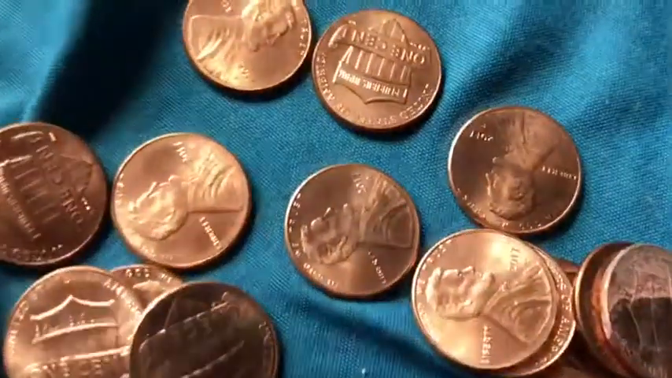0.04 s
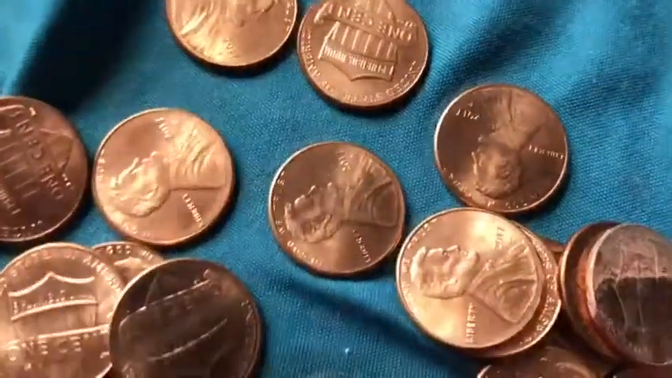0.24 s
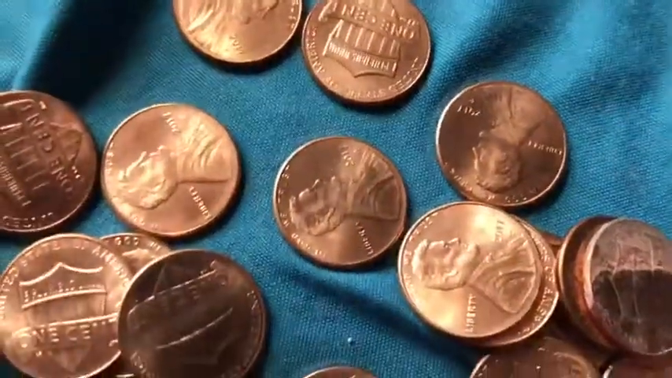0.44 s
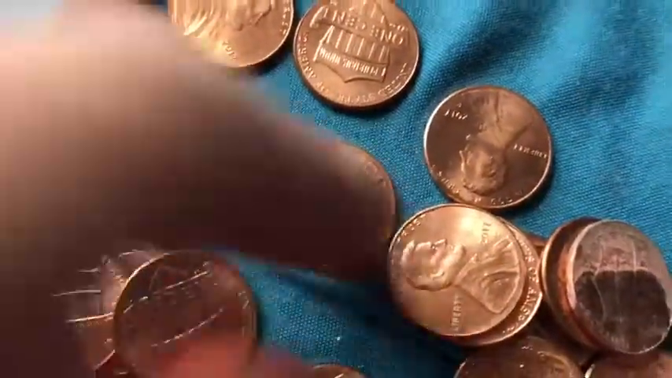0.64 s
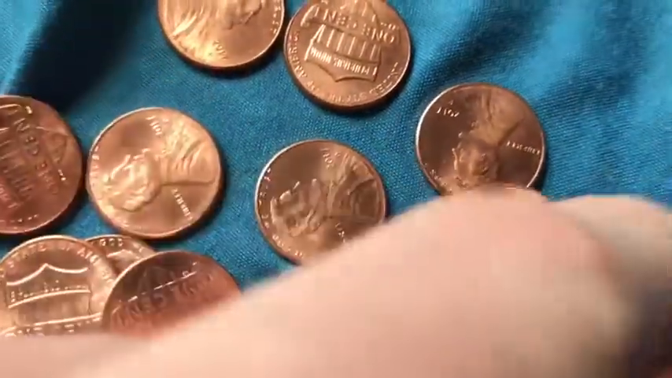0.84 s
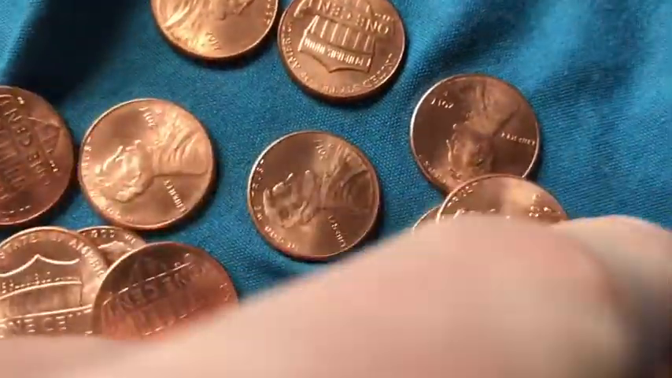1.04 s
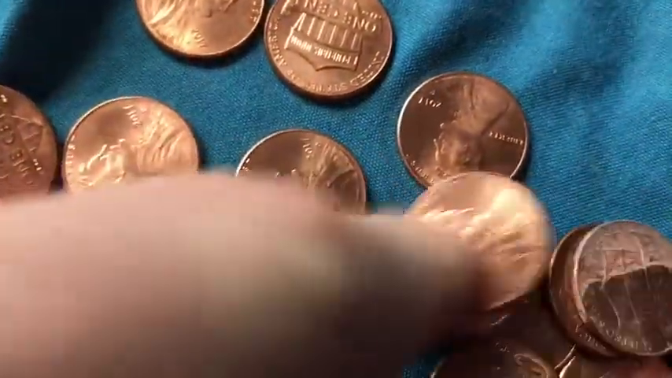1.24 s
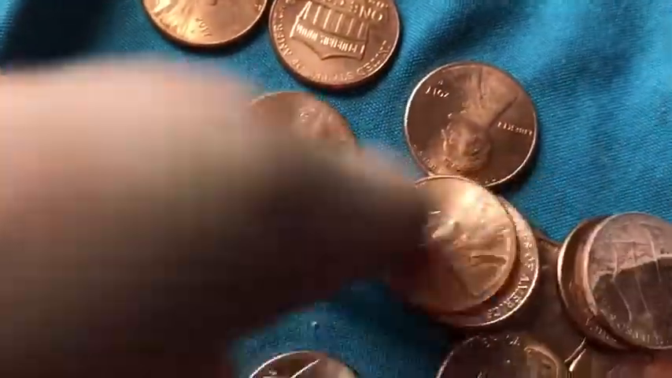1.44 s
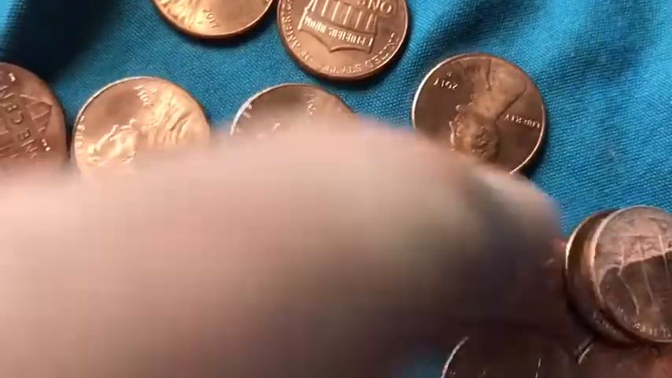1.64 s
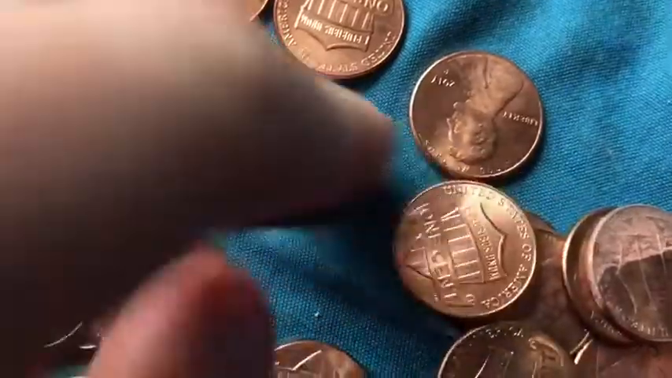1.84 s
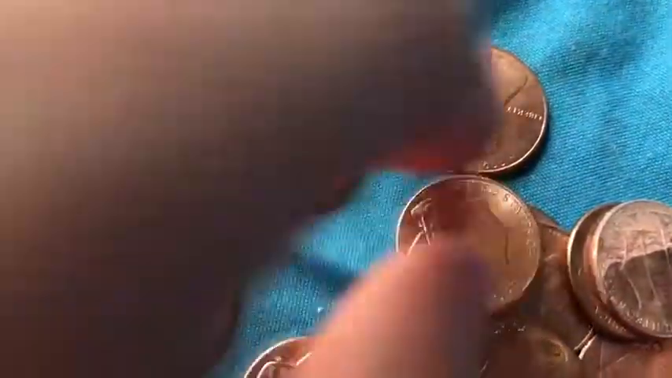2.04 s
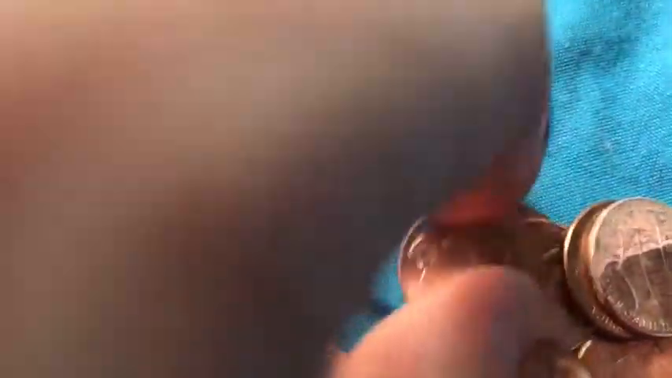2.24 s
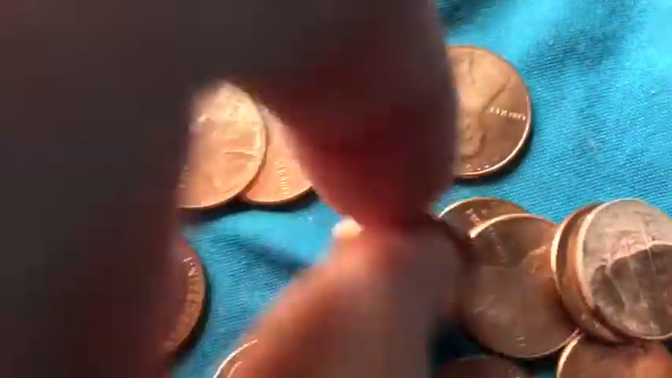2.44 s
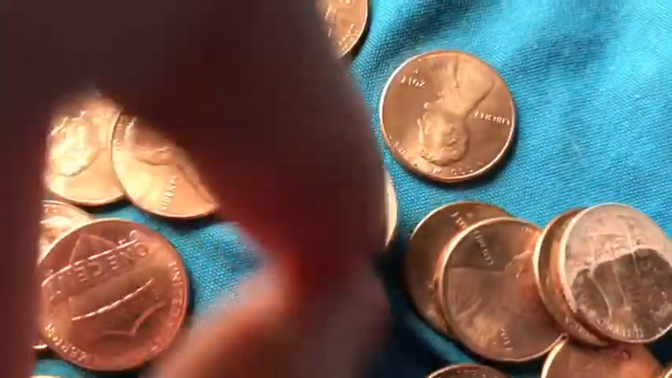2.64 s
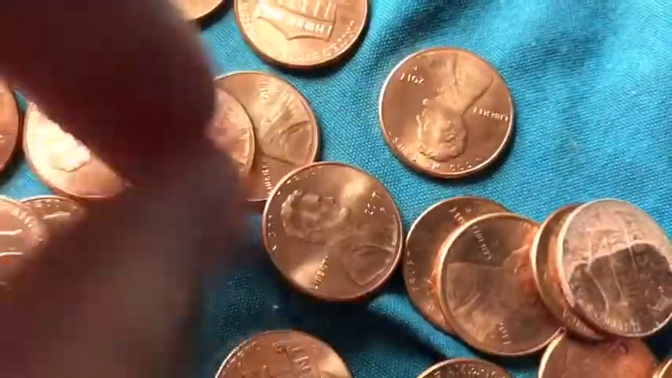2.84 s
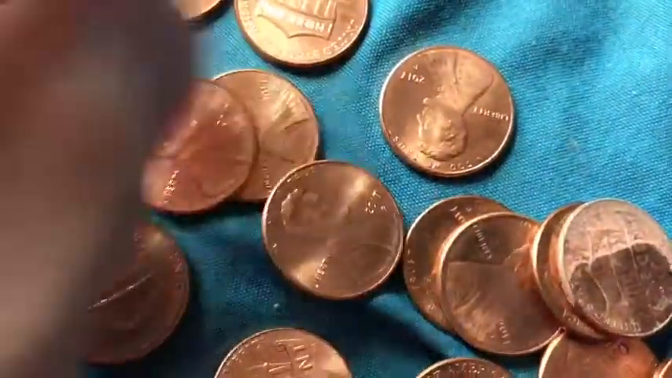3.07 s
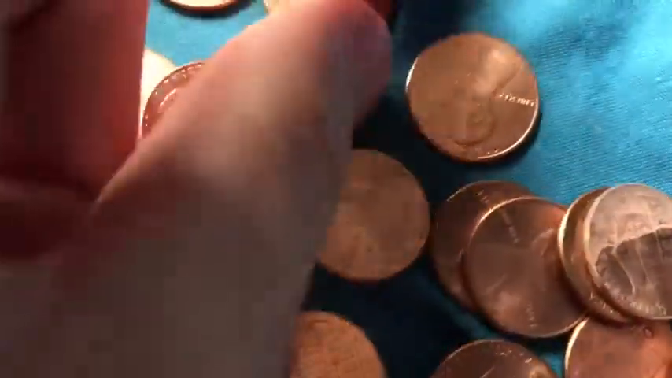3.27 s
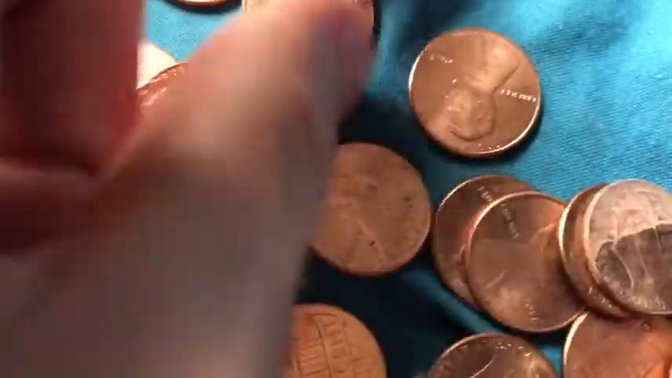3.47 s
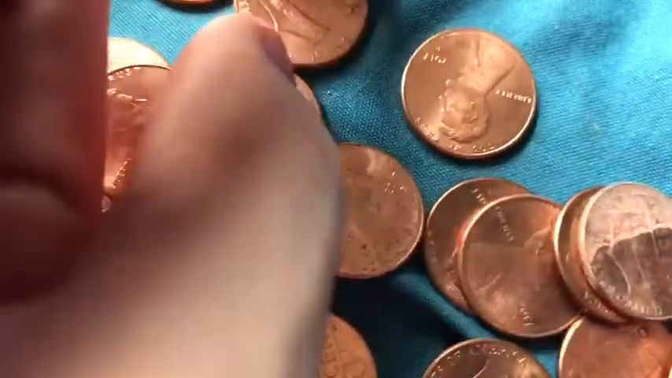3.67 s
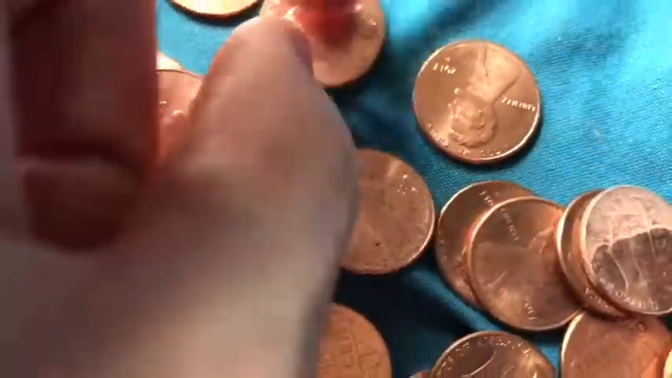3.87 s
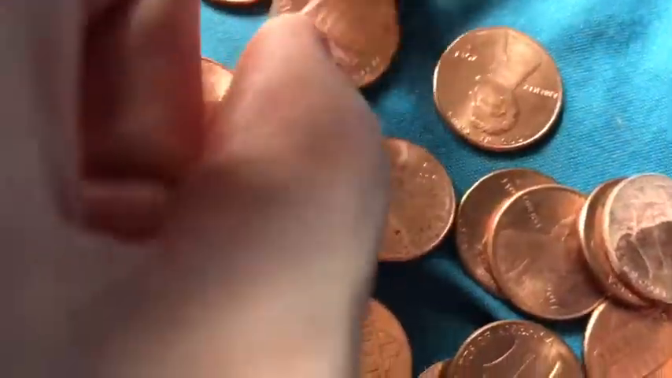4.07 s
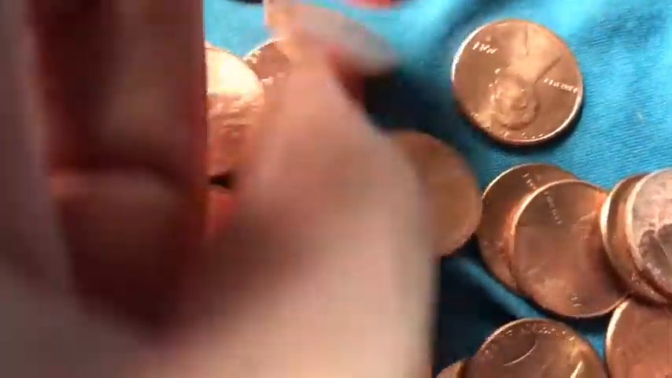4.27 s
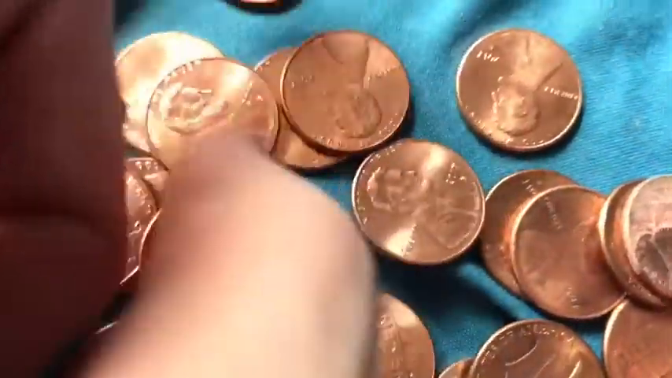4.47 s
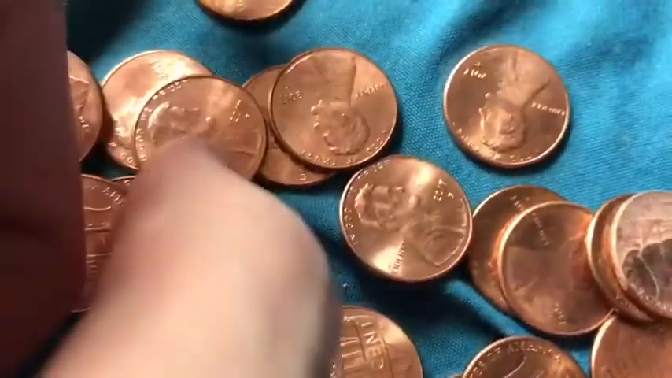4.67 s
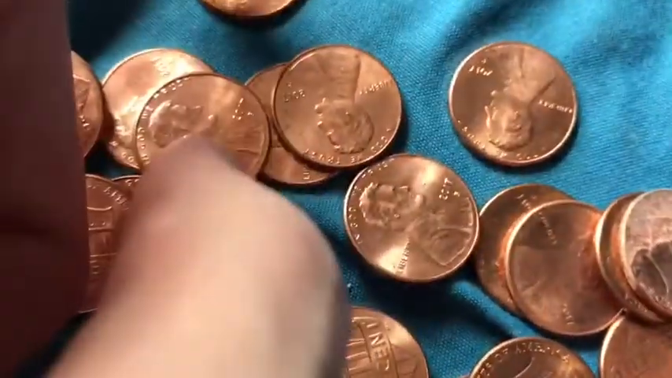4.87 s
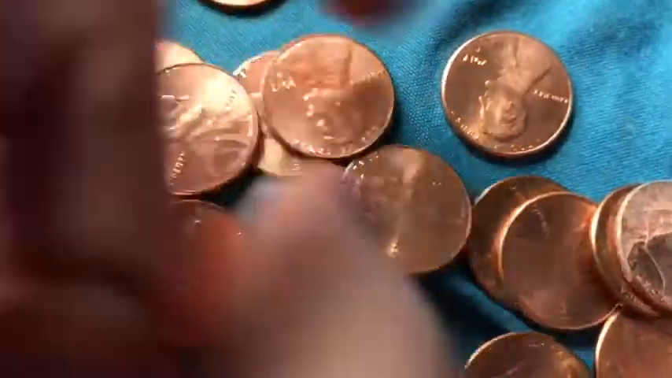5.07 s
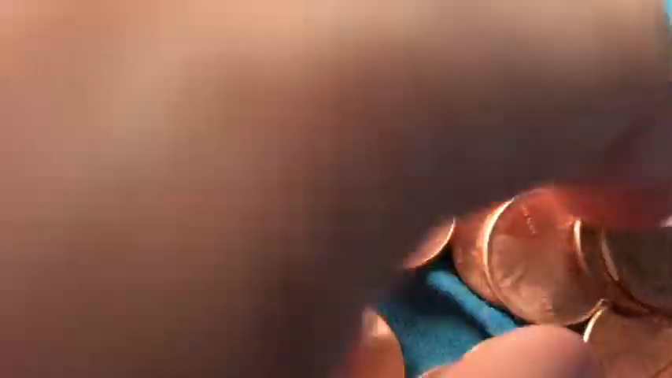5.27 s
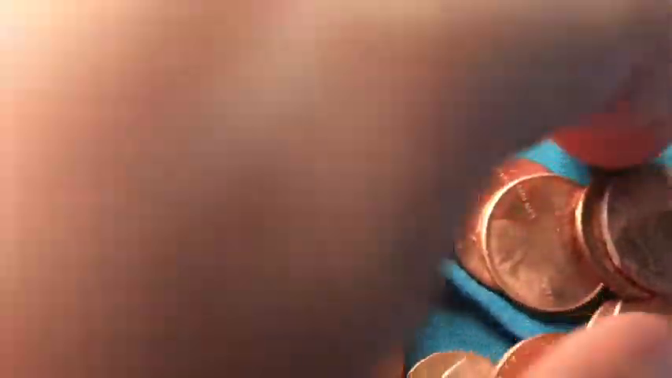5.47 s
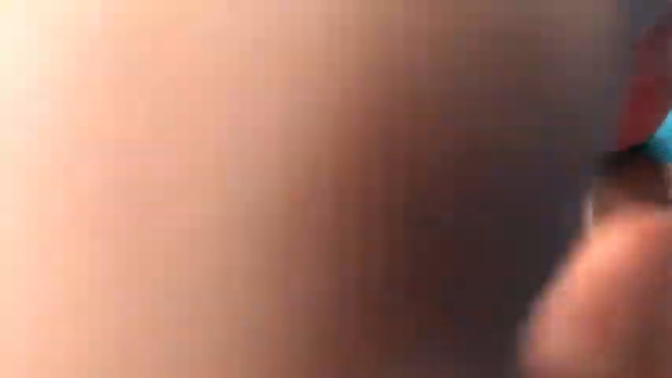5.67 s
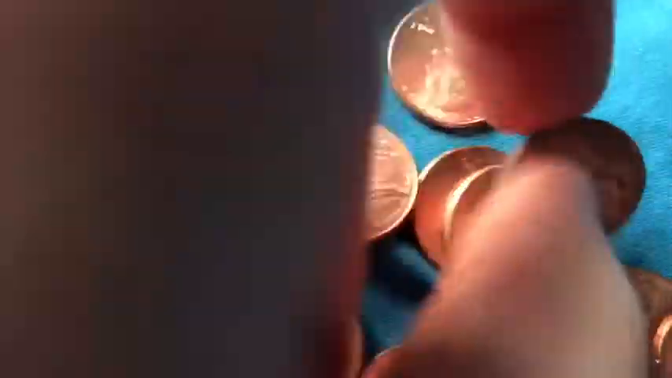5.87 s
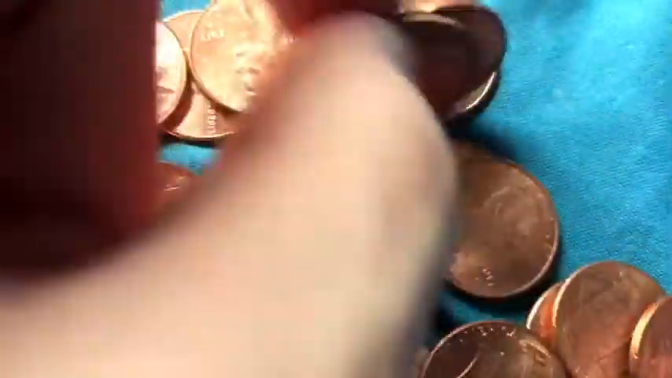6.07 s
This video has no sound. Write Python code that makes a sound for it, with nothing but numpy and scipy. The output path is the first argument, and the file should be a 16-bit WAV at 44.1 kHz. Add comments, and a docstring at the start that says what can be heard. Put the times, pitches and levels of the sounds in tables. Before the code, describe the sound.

Close to the microphone in a quiet room, faint ticks and a small creak come first. Then fingers push small coins on cloth: sharp, very high clinks with brief ringing, gritty metal slides and soft thuds, dense at first, then sparse, with a few stronger clinks and a light final cluster. Low rumble and intermittent faint hiss lie underneath.

```python
"""Coins pushed about on cloth

Fingers push small coins about on cloth, heard close in a quiet room. Noisy contacts drive damped modes: coins
clink and chatter, ring briefly very high, slide over each other or are rubbed by skin and cloth (dense
contacts) and thud (pushed resonance). A creak, ticks and a gliding squeak come early. Filtered-noise rumble,
sine hum and a faint high whine run throughout; a noise hiss switches on for five spells."""
import sys
import numpy as np
from scipy import signal
from scipy.fft import rfft, irfft
from scipy.io import wavfile
from scipy.ndimage import uniform_filter1d

SR = 44100
rng = np.random.default_rng(int(sys.argv[2]) if len(sys.argv) > 2 else 0)


def materialize(psi):
    """Save the field psi as 16-bit PCM at rate SR to the path in sys.argv[1].

    A 1-D psi becomes a single channel; in a 2-D psi each row is a channel.
    """
    bounded = np.clip(np.atleast_2d(psi).T, -1, 1)
    quanta = np.round(bounded * 32767).astype(np.int16)
    wavfile.write(sys.argv[1], SR, quanta)


N = 269314


def from_db(db):
    """Decibels to amplitude."""
    return 10 ** (np.asarray(db) / 20)


def rms_one(x):
    """Scale to an rms of 1."""
    return x / np.sqrt(np.mean(x ** 2) + 1e-20)


def peak_one(x):
    """Scale to a peak of 1."""
    return x / np.abs(x).max()


def add(out, start_s, sound):
    """Mix a sound into out, cut at its end."""
    i = round(start_s * SR)
    out[i:i + len(sound)] += sound[:N - i]


def minimum_phase(spectrum):
    """Causal impulse response with the given (Hz, dB) response, by folding the cepstrum."""
    hz = np.maximum(np.arange(2049) * SR / 4096, 10)
    points_hz, points_db = np.transpose(spectrum)
    log_gain = np.interp(np.log(hz), np.log(points_hz), points_db) * np.log(10) / 20
    cepstrum = irfft(log_gain)
    cepstrum[1:2048] *= 2
    cepstrum[2049:] = 0
    return irfft(np.exp(rfft(cepstrum)))


def coloured(x, spectrum):
    """Filter x to the given (Hz, dB) response."""
    return signal.fftconvolve(x, minimum_phase(spectrum))[:len(x)]


def ring(clicks, hz, t60_s):
    """Damped resonance: a unit click sets a sine of height 1 ringing."""
    radius = from_db(-60 / (t60_s * SR))
    angle = 2 * np.pi * min(hz, .45 * SR) / SR
    poles = [1, -2 * radius * np.cos(angle), radius * radius]
    return signal.lfilter([0, np.sin(angle)], poles, clicks + 1e-18)


# Room rumble spectrum. Each row: frequency in Hz, relative density in dB per Hz.
ROOM_SPECTRUM = [(15, -42), (25, -17.5), (43, -9), (65, -3), (87, -20), (154, -18.5), (245, -21.5),
                 (378, -30), (766, -33), (1390, -38.5), (4990, -45), (11600, -48.5), (15200, -45.5),
                 (16500, -84)]
ROOM_RMS_DB = -58.5


def rumble():
    """Steady noise with most of its power in the lowest octaves."""
    settle = 4096
    noise = rng.standard_normal(N + settle)
    return from_db(ROOM_RMS_DB) * rms_one(coloured(noise, ROOM_SPECTRUM)[settle:])


# Mains hum. Each row: frequency in Hz, level in dB rms.
HUM_TONES = [(60, -81.5), (120, -74)]


def hum():
    """Steady sines at the mains frequency and its double, in random phase."""
    t = np.arange(N) / SR
    out = np.zeros(N)
    for hz, rms_db in HUM_TONES:
        out += from_db(rms_db) * np.sqrt(2) * np.sin(2 * np.pi * (hz * t + rng.random()))
    return out


WHINE_HZ, WHINE_T60_S, WHINE_RMS_DB = 11350, 0.0062, -87


def whine():
    """Noise through one resonance: a faint steady band high up."""
    return from_db(WHINE_RMS_DB) * rms_one(ring(rng.standard_normal(N), WHINE_HZ, WHINE_T60_S))


# Hiss spectrum. Each row: frequency in Hz, relative density in dB per Hz.
HISS_SPECTRUM = [(300, 9.5), (1000, 0), (4000, -1), (7500, -4), (10500, -6.5), (12500, -4.5), (15500, -7)]
# Spells of hiss. Each row: start in seconds, end in seconds.
HISS_SPELLS = [(0.84, 3.235), (3.42, 3.828), (4.26, 4.875), (5.4, 5.56), (5.76, 6.2)]
HISS_RMS_DB = -61.5   # before gating


def hiss():
    """Coloured noise, gated by smoothed steps; silent between the spells."""
    t = np.arange(N) / SR
    gate = sum((t > start_s) * (t < end_s) for start_s, end_s in HISS_SPELLS) * 1.
    gate = uniform_filter1d(gate, size=400)
    return gate * from_db(HISS_RMS_DB) * rms_one(coloured(rng.standard_normal(N), HISS_SPECTRUM))


# Squeak glide. Each row: time in seconds, pitch in Hz, peak level in dB.
SQUEAK_GLIDE = [(0.551, 3900, -85), (.59, 4080, -71), (.63, 4000, -74)]


def squeak():
    """A thin gliding sine, its pitch and level interpolated between points."""
    t = np.arange(N) / SR
    times_s, pitches_hz, peaks_db = np.transpose(SQUEAK_GLIDE)
    level = np.interp(t, times_s, from_db(peaks_db), 0, 0)
    return level * np.sin(2 * np.pi * np.cumsum(np.interp(t, times_s, pitches_hz)) / SR)


# Modes of the creaking body. Each row: frequency in Hz, relative level in dB, t60 in seconds.
CREAK_MODES = [(586, 5, 0.024), (1470, -2.5, 0.01), (3170, -7, 0.0013), (5360, -23, 0.0034)]
CREAK_START_S, CREAK_LENGTH_S, CREAK_PEAK_DB = .212, 0.035, -34.5


def creak():
    """A burst of slips, as swelling noise, through the modes of a hollow body."""
    out = np.zeros(N)
    swell = np.hanning(round(CREAK_LENGTH_S * SR))
    slips = np.pad(swell * rng.standard_normal(len(swell)), (0, 1500))
    body = sum(from_db(db) * rms_one(ring(slips, hz, t60_s)) for hz, db, t60_s in CREAK_MODES)
    add(out, CREAK_START_S, from_db(CREAK_PEAK_DB) * peak_one(body))
    return out


# Small ticks nearby. Each row: start in seconds, peak in dB, centre in Hz.
TICK_EVENTS = [(0.074, -41, 900), (0.077, -37, 4300), (0.0902, -41, 3000), (.5755, -40, 5400)]


def ticks():
    """Single dry contacts: under 1 ms of noise into a resonance that dies in 3.1 cycles."""
    out = np.zeros(N)
    for start_s, peak_db, hz in TICK_EVENTS:
        contact = np.pad(rng.standard_normal(30), (0, 400))
        add(out, start_s, from_db(peak_db) * peak_one(ring(contact, hz, 3.1 / hz)))
    return out


# Fingers and coins dropping on the cloth. Each row: start in seconds, peak in dB, pitch in Hz.
THUD_EVENTS = [(0.071, -41.5, 142), (0.878, -42, 307), (0.927, -47, 270), (1.675, -42, 196),
               (1.725, -39, 322), (1.748, -43.5, 134), (1.792, -39, 312), (1.816, -42.5, 119),
               (2.192, -48, 125), (2.221, -42.5, 260), (2.432, -37, 100), (2.466, -41.5, 210),
               (2.568, -39, 420), (2.605, -29, 267), (2.635, -43.5, 318), (2.715, -40, 307),
               (2.785, -39.5, 155), (2.824, -40.5, 287), (3.345, -42.5, 296), (4.261, -41, 265),
               (4.419, -31.5, 160), (4.458, -43.5, 110), (6.089, -43.5, 310)]
THUD_T60_CYCLES, RUB_DB = 5.5, -18.5   # rub level relative to the thud


def thuds():
    """A soft push of some milliseconds on the padded surface, inside a short dull rub of cloth."""
    out, rub = np.zeros(N), np.zeros(N)
    for start_s, peak_db, hz in THUD_EVENTS:
        press_release = np.gradient(np.hanning(round(1.2 * SR / hz)))
        push = np.pad(press_release, (0, 4000))
        add(out, start_s, from_db(peak_db) * peak_one(ring(push, hz, THUD_T60_CYCLES / hz)))
        add(rub, start_s - .03, from_db(peak_db + RUB_DB) * np.hanning(3000))
    band = signal.butter(3, [150, 450], "band", fs=SR, output="sos")
    cloth = signal.sosfilt(band, rng.standard_normal(N))
    return out + rub * rms_one(cloth)


def grains(count, per_s, spread_db):
    """Random contacts of uneven size and sign."""
    sizes = from_db(spread_db * np.minimum(rng.exponential(1, count), 4))
    signs = rng.choice([-1, 1], count)
    return sizes * signs * (rng.random(count) < per_s / SR)


CLUMP_S = .0015


def clumps(depth_db):
    """A gain that wanders from one clump of contacts to the next."""
    t = np.arange(6000) / SR
    heights = np.clip(rng.standard_normal(200), -2, 1.5)
    return from_db(depth_db * np.interp(t / CLUMP_S, np.arange(200), heights))


# Spectrum of the contact. Each row: frequency in Hz, relative density in dB per Hz.
CRACK_SPECTRUM = [(300, -2), (600, -15), (1500, -10.5), (3000, -3.5), (8400, 1), (10500, -6), (13000, 29.5),
                  (15500, 9)]


def crack(contacts, hz):
    """The contact itself: broad, with a hump where this pair of faces speaks most and chance humps elsewhere."""
    broad = coloured(contacts, CRACK_SPECTRUM)
    out = broad + from_db(-5) * ring(broad, hz, 0.0027)
    for other_hz in rng.uniform(2090, 11780, size=5):
        out += from_db(rng.normal(-19.0, 7.4)) * ring(broad, other_hz, 0.0024)
    return out


# Coin modes, split and damped by cloth and skin.
# Each row: mean frequency in Hz, mean relative level in dB, longest t60 in seconds.
COIN_MODES = [(12480, 0, .12), (12650, -2, .1), (12770, -2, .1), (12980, -4, .05), (13500, 0, .006),
              (14000, 0, .005), (14600, -2, .005), (15200, -2, .005), (11700, -8, .004)]
MODE_SCATTER_DB = 8   # each blow favours other modes


def coin(contacts, t60_s):
    """Contacts drive every mode with a strength of its own; the more damped a mode, the more its pitch scatters."""
    out = np.zeros(len(contacts))
    for hz, db, longest_s in COIN_MODES:
        strength = from_db(db + rng.normal(0, MODE_SCATTER_DB))
        pitch_hz = hz + rng.normal(0, 13 / np.sqrt(longest_s))
        out += strength * ring(contacts, pitch_hz, min(t60_s, longest_s))
    return out


# Sliding strokes: coins over coins, and, where centred low (near 4 kHz), skin or cloth rubbing. # Each row:
# start in seconds, length in seconds, scrape in dB rms, centre in Hz, ring in dB rms.
SLIDE_EVENTS = [(0.82, 0.11, -50, 6100, -55), (0.924, 0.044, -56.5, 6600, -41.5),
                (1.346, 0.075, -48, 9000, -54), (1.489, 0.033, -64, 8400, -89),
                (1.661, 0.04, -55, 9300, -47), (1.721, 0.082, -48, 6200, -46),
                (1.792, 0.034, -51.5, 6500, -62), (1.834, 0.06, -59.5, 8900, -77),
                (1.885, 0.07, -46, 9000, -50), (1.933, 0.075, -58.5, 7260, -65),
                (2, 0.024, -69, 7700, -49.5), (2.201, 0.042, -54, 8100, -64),
                (2.323, 0.029, -64, 6300, -70), (2.46, 0.12, -52, 5950, -64),
                (2.591, 0.023, -66, 7840, -77), (2.633, 0.019, -69, 9000, -43.5),
                (2.705, 0.062, -53.5, 5800, -69), (2.773, 0.046, -55.5, 6450, -55),
                (2.819, 0.028, -54, 8100, -54), (3.528, 0.086, -63.5, 6650, -70),
                (3.598, 0.052, -58, 6400, -56), (3.866, 0.041, -62.5, 7250, -64),
                (3.896, 0.013, -73, 6900, -55), (4.228, 0.017, -73, 7000, -80),
                (4.244, 0.041, -44.5, 6400, -45), (4.418, 0.072, -52, 7900, -36.5),
                (5.348, 0.047, -61, 4150, -57), (5.398, 0.039, -71, 4000, -86.5),
                (5.492, 0.077, -56.5, 4450, -55.5), (5.577, 0.073, -62, 4040, -86),
                (5.641, 0.12, -76.5, 4450, -90), (5.726, 0.046, -58, 4040, -92),
                (5.777, .04, -54.5, 9300, -61), (5.904, 0.059, -55.5, 6700, -56),
                (5.982, 0.071, -58, 6800, -72), (6.027, 0.028, -51.5, 5940, -47)]
STROKE_TOP, STROKE_START, STROKE_END = .35, 0.14, 0.029   # loudest at this share of it; gains at its ends
SLIDE_CLUMPS_DB = 5
SCRAPE_REACH = 1.54   # a scrape dulls above this multiple of its centre


def slides():
    """Relief catching on relief: dense uneven contacts that swell and fade with the stroke."""
    out = np.zeros(N)
    for start_s, length_s, scrape_db, hz, ring_db in SLIDE_EVENTS:
        along = np.linspace(0, 1, round(length_s * SR))
        stroke = np.interp(along, [0, STROKE_TOP, 1], [STROKE_START, 1, STROKE_END])
        catches = clumps(SLIDE_CLUMPS_DB) * grains(6000, 5000, 3.44)
        contacts = np.pad(stroke * catches[:len(along)], (0, 1500))
        within = np.sqrt(len(contacts) / len(along))   # rms counts over the stroke, without its tail
        pole = np.exp(-2 * np.pi * SCRAPE_REACH * hz / SR)
        scrape = signal.lfilter([1], [1, -2 * pole, pole ** 2], crack(contacts, hz))
        add(out, start_s, within * from_db(scrape_db) * rms_one(scrape))
        add(out, start_s, within * from_db(ring_db) * rms_one(coin(contacts, 0.032)))
    return out


# Coin on coin. Each row: start in seconds, crack peak in dB, crack centre in Hz, chatter t60 in seconds,
# ring peak in dB, ring t60 in seconds (long where the coin is left free).
CLINK_EVENTS = [(0.809, -34, 2860, 0.005, -48, 0.05), (0.8217, -47, 8400.0, 0.005, -54, 0.015),
                (0.835, -30, 9400, 0.0037, -34, 0.015), (0.8406, -36, 8400.0, 0.0048, -20, 0.041),
                (0.858, -30, 4200.0, 0.0088, -31, 0.015), (0.867, -27, 9500.0, 0.0072, -33, 0.015),
                (0.8802, -18.5, 10400, 0.011, -22, 0.015), (0.8854, -26, 4300.0, 0.015, -28, 0.014),
                (0.899, -28.5, 4000.0, 0.013, -40, 0.049), (0.928, -31, 10800, 0.006, -10, 0.081),
                (0.937, -36, 10000.0, 0.006, -23, 0.015), (1.207, -31.5, 9100, 0.016, -26.5, 0.02),
                (1.3398, -21, 8600, 0.0034, -33, 0.01), (1.3576, -23.5, 8250, 0.011, -16.5, 0.013),
                (1.363, -34, 8400, 0.004, -21, 0.015), (1.377, -38, 8200, 0.004, -19, 0.017),
                (1.664, -37, 8250, 0.005, -22, 0.008), (1.6681, -21, 8600, 0.0083, -11.5, 0.015),
                (1.673, -8.5, 11000, 0.019, -7.5, 0.008), (1.6844, -22, 8900.0, 0.004, -12, 0.008),
                (1.7165, -31, 9800.0, 0.009, -29, 0.017), (1.7226, -42, 5900.0, 0.0077, -19, 0.011),
                (1.7457, -20.5, 9700.0, 0.0047, -16.5, 0.016), (1.7674, -23.5, 4600.0, 0.013, -26, 0.015),
                (1.7957, -27, 9000.0, 0.026, -31, 0.05), (1.8318, -15, 10700, 0.0034, -19, 0.01),
                (1.8353, -23, 9700, 0.0026, -21, 0.012), (1.8466, -30, 10600, 0.006, -35, 0.05),
                (1.8793, -33, 8500.0, 0.004, -33, 0.008), (1.8912, -31, 8500.0, 0.0036, -26, 0.015),
                (1.8993, -26.5, 6800.0, 0.0027, -27, 0.014), (1.911, -22.5, 8260, 0.035, -52, 0.015),
                (1.927, -27, 9200.0, 0.0068, -23, 0.015), (2.0019, -35.5, 6550, 0.011, -35, 0.06),
                (2.193, -33, 4500.0, 0.0059, -24.5, 0.009), (2.2077, -32, 3900.0, 0.018, -28, 0.015),
                (2.22, -21, 9740, 0.0057, -14, 0.02), (2.2254, -22, 6150, 0.016, -17, 0.019),
                (2.298, -29, 8700, 0.0088, -45, 0.016), (2.3427, -20, 5680, 0.019, -33, 0.015),
                (2.4132, -32, 7200, 0.011, -43, 0.015), (2.429, -38, 7400.0, 0.004, -53, 0.015),
                (2.4458, -31, 9600, 0.006, -43, 0.011), (2.4507, -22, 6900, 0.012, -38, 0.008),
                (2.457, -33, 9500, 0.005, -40, 0.009), (2.4675, -23.5, 5740, 0.017, -21, 0.036),
                (2.496, -26, 8740, 0.033, -30, 0.035), (2.5258, -26.5, 4470, 0.026, -28, 0.017),
                (2.5352, -38, 8700.0, 0.008, -27, 0.015), (2.56, -33, 4500.0, 0.004, -41, 0.015),
                (2.57, -31, 4400.0, 0.005, -42, 0.015), (2.6352, -35, 10100, 0.0044, -18, 0.093),
                (2.671, -30, 4700, 0.014, -39, 0.077), (2.7133, -19.5, 5920, 0.013, -28, 0.015),
                (2.7295, -28, 6350, 0.0055, -29, 0.012), (2.738, -34, 2510, 0.076, -41, 0.008),
                (2.783, -40, 8450, 0.006, -24, 0.009), (2.8, -35, 6600.0, 0.018, -35.5, 0.015),
                (2.818, -37, 4100.0, 0.004, -39, 0.008), (2.8241, -21.5, 9600.0, 0.033, -29.5, 0.07),
                (3.3491, -24.5, 10660, 0.015, -18, 0.048), (3.4182, -29, 9400.0, 0.015, -18.5, 0.011),
                (3.533, -36, 8500.0, 0.004, -37, 0.01), (3.5543, -39, 5850, 0.004, -31, 0.015),
                (3.576, -41, 6300.0, 0.008, -36, 0.015), (3.624, -43, 4400.0, 0.029, -31.5, 0.034),
                (4.1114, -40, 7000.0, 0.004, -44, 0.008), (4.2399, -30, 6040, 0.0033, -35, 0.0099),
                (4.2495, -15.5, 6100, 0.004, -18.5, 0.015), (4.26, -19, 6000.0, 0.0051, -20, 0.08),
                (4.4109, -19, 8300, 0.0052, -20.5, 0.008), (4.4155, -21.5, 10300, 0.0037, -7.5, 0.015),
                (4.4197, -19, 8300, 0.0079, -8.5, 0.05), (4.4269, -25, 8500, 0.014, -12, 0.015),
                (4.434, -37, 9500.0, 0.005, -21, 0.1), (4.446, -40, 5800.0, 0.03, -32, 0.015),
                (4.4601, -26.5, 8270, 0.0035, -18, 0.054), (5.3808, -44, 4400.0, 0.0054, -28.5, 0.021),
                (5.406, -29, 6340, 0.015, -21.5, 0.024), (5.461, -27, 4200, 0.015, -26, 0.065),
                (5.5132, -38, 6300, 0.01, -28, 0.015), (5.541, -45, 4100.0, 0.014, -29.5, 0.014),
                (5.6037, -32, 3130, 0.0088, -35.5, 0.048), (5.74, -41, 3400.0, 0.009, -44, 0.016),
                (5.7824, -21, 10200, 0.0026, -18, 0.012), (5.7952, -36.5, 8200.0, 0.024, -25, 0.028),
                (5.917, -40, 7900.0, 0.011, -38, 0.012), (5.9274, -36, 8800.0, 0.029, -28, 0.015),
                (5.983, -40, 8000, 0.022, -40.5, 0.015), (6.0396, -28, 6100, 0.0082, -30, 0.05),
                (6.0892, -16.5, 8700, 0.0046, -28, 0.028)]
CHATTER_DB, CHATTER_CLUMPS_DB = -10, 3   # bounces, relative to the first contact
FIRST_TOUCH_S = 0.00058   # decay constant of the first contact, a short grind


def clinks():
    """A sharp first contact, then a dying chatter; both crack and ring the coin."""
    out, t = np.zeros(N), np.arange(6000) / SR
    for start_s, crack_db, hz, chatter_t60_s, ring_db, ring_t60_s in CLINK_EVENTS:
        fade = from_db(CHATTER_DB - 60 * (t / max(chatter_t60_s, .002)) ** 1.95)
        chatter = fade * grains(len(t), 9000, 3.0) * clumps(CHATTER_CLUMPS_DB)
        first_touch = rng.standard_normal(len(t)) * np.exp(-t / FIRST_TOUCH_S)
        contacts = chatter + first_touch
        add(out, start_s, from_db(crack_db) * peak_one(crack(contacts, hz)))
        add(out, start_s, from_db(ring_db) * peak_one(coin(contacts, ring_t60_s)))
    return out


def scene():
    """Sum of all sources, as one channel."""
    background = rumble() + hum() + whine() + hiss()
    return (background + squeak() + creak() + ticks() + thuds() + slides() + clinks())[None]


CUTOFF_HZ = 16350   # 50 dB down from here up


def record(dry):
    """The top is cut steeply by a low-pass."""
    return signal.sosfilt(signal.cheby2(14, 50, CUTOFF_HZ, fs=SR, output="sos"), dry)


dry = scene()
out = record(dry)
materialize(out)
```